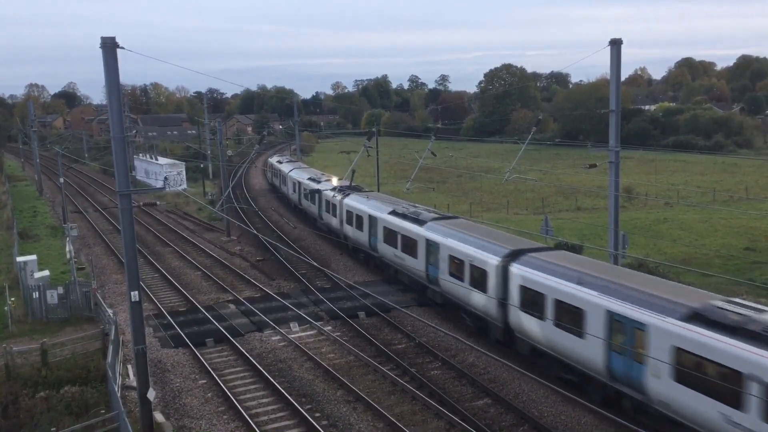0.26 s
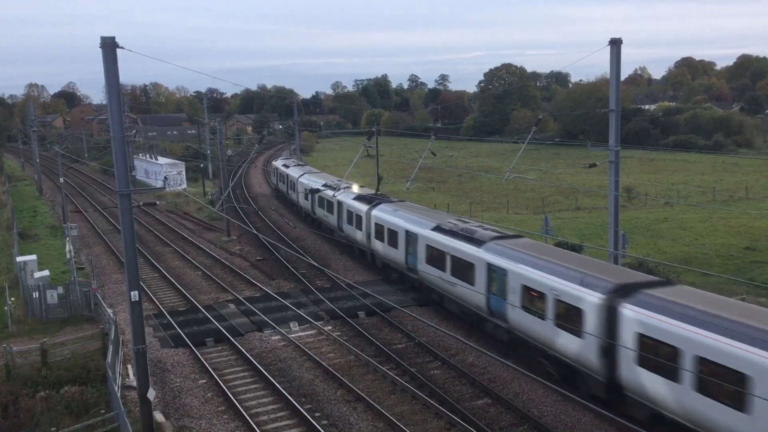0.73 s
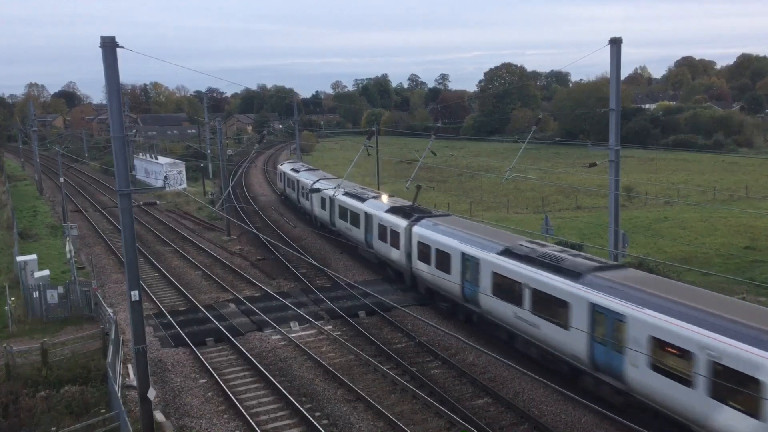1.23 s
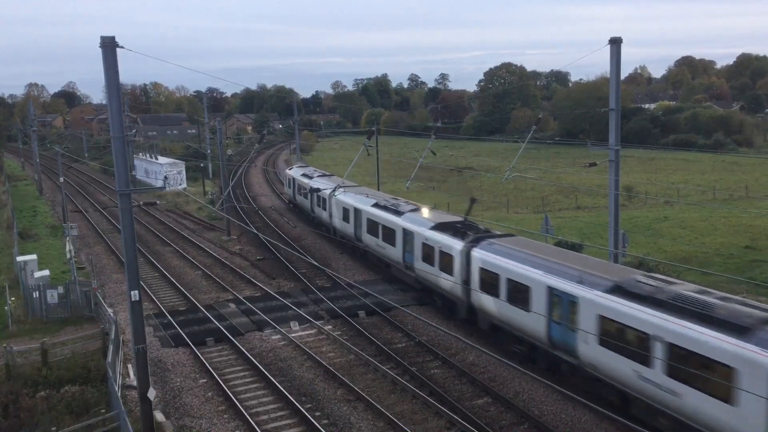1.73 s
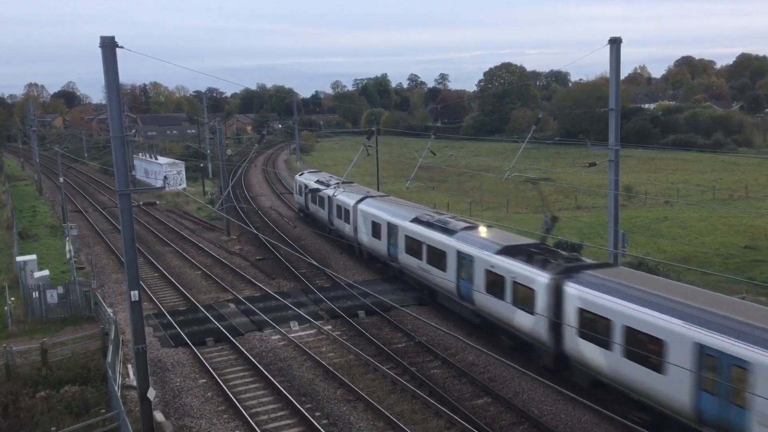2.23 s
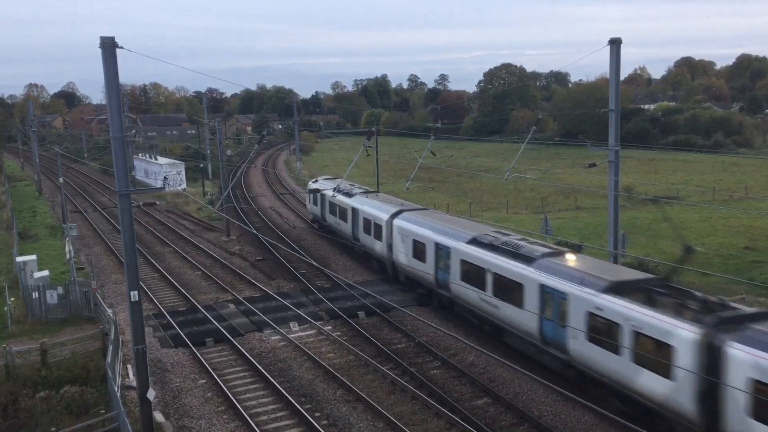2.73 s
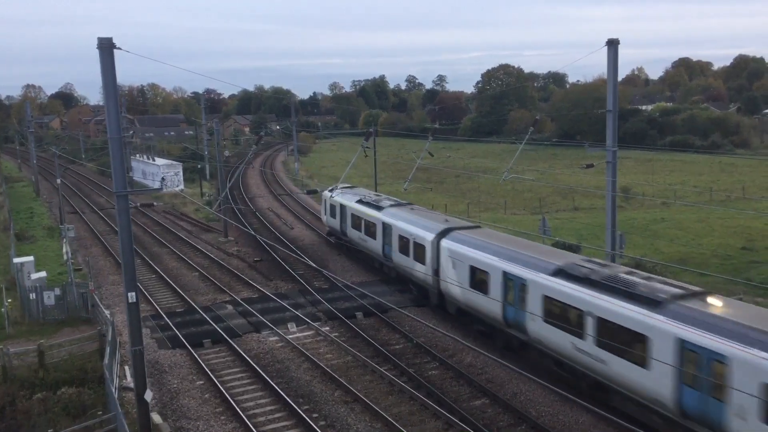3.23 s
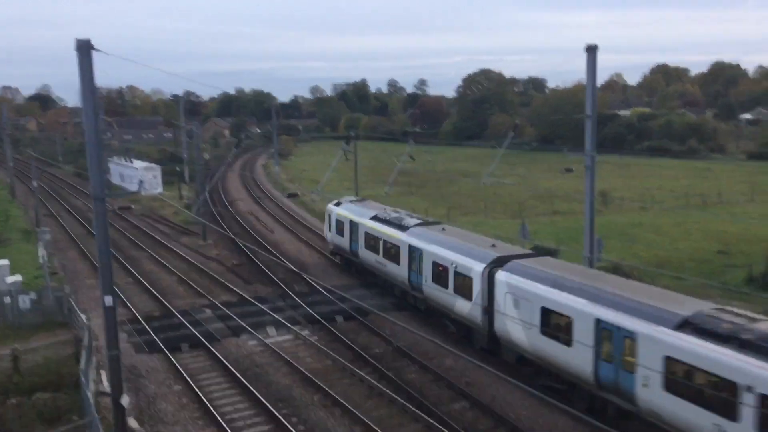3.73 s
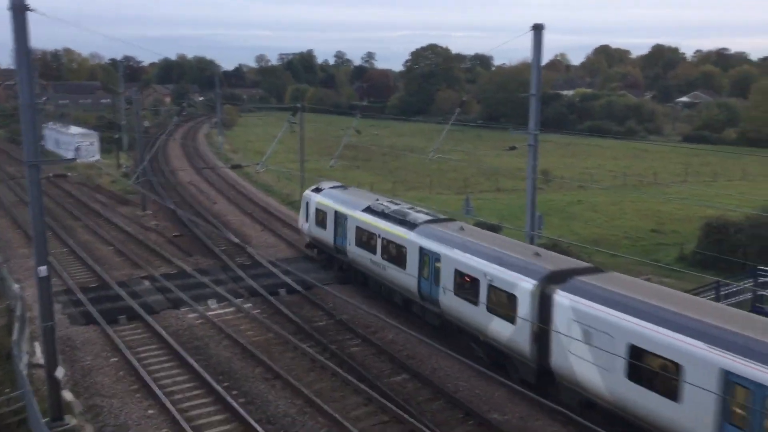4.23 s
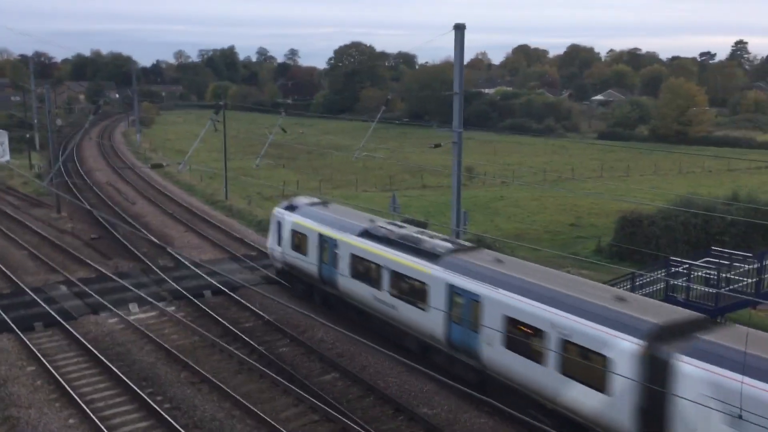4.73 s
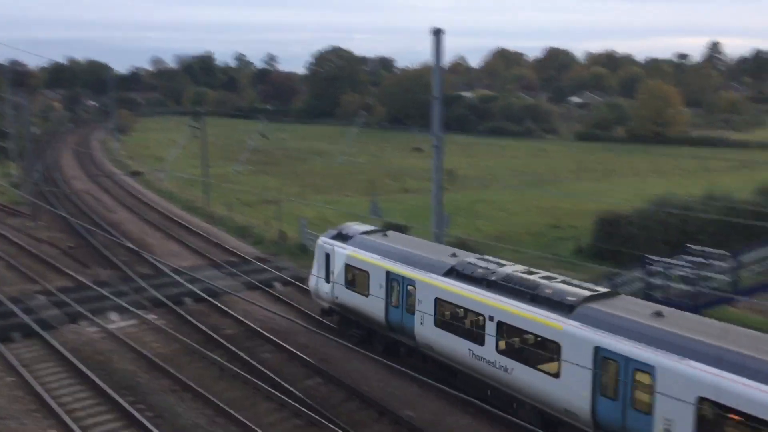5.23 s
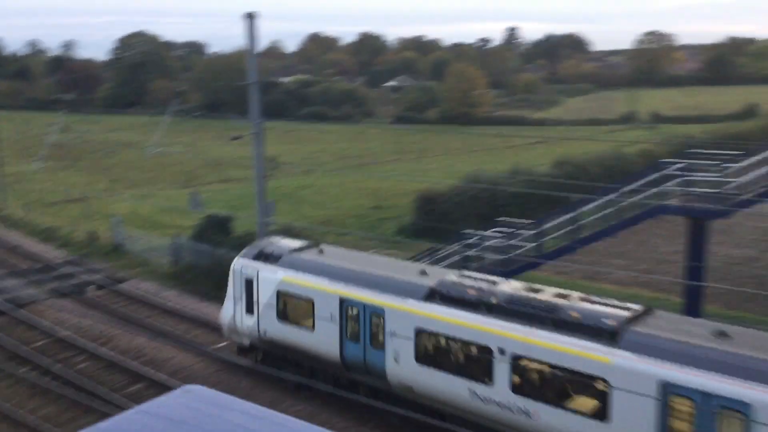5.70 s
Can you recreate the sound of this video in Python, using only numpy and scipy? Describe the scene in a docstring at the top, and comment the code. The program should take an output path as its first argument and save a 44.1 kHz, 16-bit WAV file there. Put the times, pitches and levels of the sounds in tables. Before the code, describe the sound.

Train wheels rumble and sing on the rails, clattering over a junction with dull knocks and ringing double bangs.

```python
"""An electric passenger train runs through a junction below a footbridge.
From the start the wheels roar and sing over a low rumble, and the pointwork answers with dull knocks
and short cracks. From half a second on, each bogie bangs twice over a ringing crossing, its flanges
sizzling on the check rail. Near 1.7 s one flange scrapes and squeaks. Around 3.5 s a rasping drone
climbs briefly under one coach, and more bogies bang through to the end."""
import sys
import numpy as np
from scipy import signal
from scipy.fft import rfft, irfft, next_fast_len
from scipy.io import wavfile
from scipy.ndimage import map_coordinates

SR = 44100
rng = np.random.default_rng(int(sys.argv[2]) if len(sys.argv) > 2 else 0)


def store_pcm(level_fs):
    """Save levels as 16-bit WAV."""
    pcm = np.round(np.clip(level_fs, -1, 1) * 32767).astype(np.int16)
    wavfile.write(sys.argv[1], SR, np.atleast_2d(pcm).T)


N = 262835
T = np.arange(N) / SR

# ringing modes of the wheel discs: pitch_hz, width_hz, level_db
WHEEL_MODES = [(1425, 24, -12), (2105, 46, -11), (2163, 37, -11.5), (2280, 92, -18), (2797, 66, -15),
               (2878, 83, -11.5), (3235, 260, -18.5), (3604, 68, -17), (4020, 79, -24.5),
               (4600, 133, -19.5), (5610, 110, -22.5), (6600, 280, -28), (7620, 140, -32)]
# tone of the rumbling track and car bodies: frequency_hz, level_db
RUMBLE_SPECTRUM = [(20, -21), (35, -12), (60, 5), (130, 3), (260, 1.5), (380, -9.5), (700, -14),
                   (1500, -70)]
# rise and fall of that rumble: time_s, level_db
RUMBLE_LEVELS = [(0.0, -37.5), (1.39, -41), (1.53, -51), (1.91, -40), (2.21, -41), (2.9, -41.5), (3.2, -41),
                 (3.78, -41.5), (4.87, -44.5), (5.25, -39), (5.68, -52.5), (5.96, -40)]
# boom of the sleepers under a wheel: frequency_hz, level_db
BOOM_SPECTRUM = [(20, -47), (45, -20.5), (70, -5), (115, -3.5), (175, 0), (230, -8.5), (320, -15),
                 (600, -63.5), (3000, -110)]
# wheels striking the crossing, two to a bogie:
# start_s, thump_db, clang_db, wheel_ring_db, bite_db, wave_pitch_factor, sizzle_db
WHEEL_STRIKES = [(.541, -24, -22.5, -17, -29, 1.12, -46), (.732, -30, -24, -23, -35, 1.02, -65),
                 (1.046, -21.5, -19.5, -16.5, -37, 1.03, -45.5), (1.237, -26, -23.5, -22.5, -35, 0.94, -66),
                 (2.247, -26, -22, -20.5, -26.5, 1.07, -75), (2.438, -26, -25.5, -23.5, -39, 1.04, -74),
                 (2.757, -43, -27, -23.5, -35, 1.03, -78), (2.941, -33.5, -27.5, -22, -52, 0.99, -72),
                 (3.972, -25, -20, -23, -36, 1.06, -46), (4.157, -30, -27, -23, -45, 0.96, -66),
                 (4.484, -35, -22, -24, -35.5, 1.1, -46.5), (4.676, -27, -22.5, -25, -37, 0.99, -68),
                 (5.706, -24, -19.5, -25, -29.5, 0.92, -49.5), (5.899, -23, -24, -24, -32, 0.9, -75)]
# high wheel modes that a rubbing flange wakes: pitch_hz, width_hz, level_db
FLANGE_MODES = [(3160, 45, 18), (4040, 55, 13), (4240, 36, 16), (4660, 60, 4), (5100, 66, 7), (5280, 64, 6),
                (6200, 37, 4), (6370, 37, 9.5), (7200, 56, 7), (7430, 50, -2), (8170, 220, 4),
                (9420, 190, 3), (10500, 76, -1), (11550, 130, -2), (12400, 160, -8), (13500, 120, 2),
                (14300, 100, 3)]
# a flange scraping along the rail: frequency_hz, level_db
SCRAPE_SPECTRUM = [(900, -24), (1600, -6), (2200, 0), (3100, -15), (4100, -14), (5200, -3), (6400, -6),
                   (7500, -10), (9400, -10), (10200, -10), (11500, -12), (14000, -13), (15700, -24)]


def gain_of(db):
    """Decibels to amplitude."""
    return 10 ** (np.asarray(db) / 20)


def unit_rms(x):
    """Scales to an rms of one."""
    return x / np.sqrt(np.mean(x ** 2) + 1e-20)


def unit_hit(x, span_s=.04):
    """Gives a hit the energy of span_s seconds at an rms of one."""
    return x * np.sqrt(span_s * SR / np.sum(x ** 2))


def follow(curve, times=T):
    """Reads a curve of (time_s, value) at the given times."""
    return np.interp(times, *np.transpose(curve))


def tint(x, spectrum, pitch=1):
    """A causal EQ drawn as (frequency_hz, level_db), shifted by the factor pitch."""
    hz, db = np.transpose(spectrum)
    size = 2 * next_fast_len(len(x) // 2 + 1)
    bin_hz = abs(np.fft.fftfreq(size, 1 / SR))
    log_gain = np.log(gain_of(np.interp(np.log(bin_hz + 1), np.log(hz * pitch), db)))
    response = np.exp(np.conj(signal.hilbert(log_gain)))  # minimum phase
    return irfft(rfft(x, size) * response[:size // 2 + 1], size)[:len(x)]


def noise(spectrum):
    """Steady coloured noise with an rms of one."""
    return unit_rms(tint(rng.standard_normal(N), spectrum))


def wander(hz):
    """A random drift with an rms of one, moving at up to about hz."""
    knots = np.arange(0, T[-1] + 1, .5 / hz)
    return unit_rms(np.interp(T, knots, rng.standard_normal(N)[:len(knots)]))


def waver(x, depth, hz):
    """Lets the pitch drift by the fraction depth, up to about hz times a second."""
    drift = wander(hz)
    return map_coordinates(x, [np.cumsum(1 + depth * (drift - drift.mean()))], order=3, mode="mirror")


def resonate(force, modes):
    """Drives parallel resonances (pitch_hz, width_hz, level_db) with a force."""
    out = np.zeros(N)
    for hz, width, db in modes:
        b, a = signal.iirpeak(hz, hz / width, SR)
        out += gain_of(db) * signal.lfilter(b, a, force)
    return out


def add(mix, start_s, sound):
    """Mixes a sound in at start_s."""
    start = round(start_s * SR)
    sound = sound[max(-start, 0):]
    part = mix[max(start, 0):][:len(sound)]
    part += sound[:len(part)]


def hit_envelope(t, rise_s, decay_s):
    """Swells to a peak at t = 0, then dies away."""
    return np.exp(np.where(t < 0, -(t / rise_s) ** 2, -abs(t) / decay_s))


def bursts(hits, spectrum, rise_s, span_s=.04):
    """A rattling noise burst for each hit (peak_s, level_db, decay_s, pitch_factor)."""
    out = np.zeros(N)
    for peak_s, db, decay_s, pitch in hits:
        t = np.arange(-3 * rise_s, 6 * decay_s + .04, 1 / SR)
        burst = tint(rng.standard_normal(len(t)) * hit_envelope(t, rise_s, decay_s), spectrum, pitch)
        add(out, peak_s + t[0], gain_of(db) * unit_hit(burst, span_s))
    return out


def bending_wave(spectrum, pitch, travel_s, echo_gain, echo_s):
    """A pulse runs along the rail, highs first, roughened by echoes from the sleepers."""
    size = 4096
    hz, t = np.fft.rfftfreq(size, 1 / SR), np.arange(size) / SR
    pulse = irfft(np.exp(-4j * np.pi * travel_s * np.sqrt(500 * hz)))  # 500 Hz arrives after travel_s
    echoes = rng.standard_normal(size) * np.exp(-t / echo_s)
    pulse += echo_gain * signal.fftconvolve(pulse, echoes / np.linalg.norm(echoes))[:size]
    return tint(pulse, spectrum, pitch)


def rolling(roar_db=-40, ring_db=-.7, rumble_db=6.5, flutter_db=1.5, ring_flutter_db=2.6, lump_db=4):
    """Rough steel on rough steel: a broad roar, singing wheels and a lumpy rumble."""
    # roar of wheel on rail, and the contact force on the wheel: frequency_hz, level_db
    roar_spectrum = [(150, -8), (350, -0.5), (560, 4.5), (800, 1), (1050, -4), (1400, -4.5), (1800, -8),
                     (2500, -7.5), (3300, -19.5), (4200, -20), (5600, -19.5), (8000, -32), (9400, -31),
                     (10100, -42), (11400, -35), (13500, -46), (15500, -58)]
    force_spectrum = [(600, -17.5), (1500, 7.5), (6000, -3.0), (11000, -8.5)]
    # singing of the passing wheels: time_s, level_db
    singing_levels = [(0.0, -44), (0.43, -45), (2.01, -43), (2.34, -46), (3.24, -43.5), (3.98, -48),
                      (4.85, -46.5), (5.24, -46), (5.96, -45.5)]
    roar = noise(roar_spectrum) * gain_of(roar_db + flutter_db * wander(14))
    force = noise(force_spectrum)
    # each mode swells and fades by itself as the contact patch roams over the tread
    ring = sum(resonate(force, [mode]) * gain_of(ring_flutter_db * wander(14)) for mode in WHEEL_MODES)
    ring = unit_rms(waver(ring, depth=.009, hz=7)) * gain_of(follow(singing_levels) + ring_db)
    rumble = noise(RUMBLE_SPECTRUM) * gain_of(follow(RUMBLE_LEVELS) + rumble_db + lump_db * wander(16))
    return roar + ring + rumble


def pointwork(light_per_s=7, light_decay_s=.0053, nominal_hz=335, shake_db=-7.5, shake_decay_s=.04):
    """Each wheel drops a little: the sleepers boom and the rail knocks, both damped by ballast."""
    # heavy wheel drops: peak_s, boom_db, knock_db, pitch_hz (nominal_hz leaves the knock unshifted), decay_s
    heavy_drops = [(0.013, -27, -26.5, 352, 0.0095), (0.178, -30.5, -29, 280, 0.0054),
                   (0.32, -29, -28.5, 342, 0.0034), (.337, -25, -28.5, 380, 0.0066),
                   (0.521, -22, -35, 370, 0.0017), (.678, -28.5, -33, 333, .006),
                   (0.716, -19, -26, 320, 0.012), (.972, -28, -32, 350, 0.0014),
                   (1.111, -25.5, -26, 305, 0.0098), (1.321, -25.5, -26.5, 318, 0.022),
                   (1.348, -21.5, -25, 320, 0.0082), (1.456, -22, -28.5, 352, 0.0067),
                   (1.546, -24.5, -28.5, 393, 0.0081), (1.56, -30, -32, 646, 0.015),
                   (1.583, -20.5, -30, 373, 0.0048), (1.605, -32, -24.5, 480, 0.0092),
                   (1.617, -18, -24.5, 430, 0.0059), (1.655, -21, -55, 355, 0.003),
                   (1.737, -26, -26, 243, 0.0042), (1.955, -42, -32, 350, 0.0048),
                   (2.07, -31, -31.5, 358, 0.0033), (2.081, -32, -31, 342, 0.0038),
                   (2.173, -14, -27.5, 400, 0.0055), (2.208, -29, -30, 400, 0.0023),
                   (2.225, -27, -28.5, 315, 0.015), (2.345, -20.5, -22, 344, 0.0036),
                   (2.524, -32, -30, 323, .005), (2.666, -30, -30.5, 300, 0.0078),
                   (2.683, -23.5, -36, 340, 0.002), (2.763, -21.5, -21, 278, 0.0054),
                   (2.851, -23.5, -34, 300, 0.0085), (3.025, -34, -26.5, 295, 0.0036),
                   (3.15, -30, -34, 284, 0.012), (3.23, -32, -36, 320, 0.01),
                   (3.485, -33, -33.5, 308, 0.005), (3.542, -32, -44, 270, 0.0049),
                   (3.602, -29, -43, 400, 0.0056), (3.712, -29, -30, 404, 0.014),
                   (3.795, -22.5, -32, 344, 0.0024), (3.865, -32, -35, 332, 0.0063),
                   (3.926, -35, -28, 365, 0.006), (3.963, -23, -24, 340, 0.0075),
                   (4.003, -29, -25, 373, 0.0039), (4.056, -32, -25, 332, 0.012),
                   (4.079, -19.5, -37, 368, 0.0039), (4.191, -22, -23.5, 332, 0.018),
                   (4.226, -23.5, -21, 304, 0.0035), (4.461, -20, -19, 318, 0.023),
                   (4.577, -19.5, -27, 360, 0.023), (4.758, -21, -31, 326, 0.0031),
                   (4.791, -32.5, -40, 540, 0.0042), (4.894, -28, -45, 348, .005),
                   (4.919, -28, -39, 416, 0.0038), (4.935, -23.5, -42, 350, .004),
                   (5.014, -32, -32, 397, 0.029), (5.067, -25.5, -23, 350, 0.0021),
                   (5.091, -30.5, -33, 605, 0.014), (5.114, -29.5, -27, 403, 0.0016),
                   (5.153, -36, -38, 450, .004), (5.182, -20, -28.5, 400, 0.0062),
                   (5.191, -17.5, -31, 440, 0.013), (5.214, -21, -33, 392, 0.0023),
                   (5.258, -29, -32, 330, 0.0064), (5.277, -25, -28.5, 300, 0.0083),
                   (5.301, -27, -31.5, 397, 0.0072), (5.321, -26, -37, 330, 0.0035),
                   (5.345, -25, -20.5, 280, 0.01), (5.359, -31, -22.5, 279, .008),
                   (5.376, -29.5, -33, 260, 0.0053), (5.418, -32, -25, 314, 0.0055),
                   (5.432, -27, -32, 330, 0.0071), (5.445, -24.5, -28.5, 365, 0.0036),
                   (5.483, -36, -36.5, 383, 0.0067), (5.526, -22, -36.5, 398, 0.0037),
                   (5.567, -24, -23, 338, 0.006), (5.578, -24.5, -28, 273, 0.0046),
                   (5.594, -29, -35, 386, 0.0046), (5.604, -26.5, -35, 298, .005),
                   (5.778, -22, -22, 302, 0.0071), (5.798, -24.5, -28, 347, 0.0085)]
    # dull knock of the rail: frequency_hz, level_db
    knock_spectrum = [(100, -40.5), (200, -10.5), (270, 7.5), (400, -0.5), (550, -8.5), (780, -17.5),
                      (1000, -35), (1600, -30), (4000, -57), (12000, -105)]
    drops = list(heavy_drops)
    for slot_s in np.arange(0, T[-1], 1 / light_per_s):  # light drops ride the rumble's level
        db = follow(RUMBLE_LEVELS, slot_s) - rng.standard_normal()
        drops.append((slot_s + rng.random() / light_per_s, db + 7, db - 2, nominal_hz, light_decay_s))
    # a heavier drop booms lower
    booms = [(s - .004, db, decay, 2 ** (-.0154 * (db + 27))) for s, db, _, _, decay in drops]
    knocks = [(s - .003, db, decay, hz / nominal_hz) for s, _, db, hz, decay in drops]
    # the track bed shakes on after each heavy drop
    shakes = [(s, db + shake_db, shake_decay_s, 1) for s, db, *_ in heavy_drops]
    return (bursts(booms, BOOM_SPECTRUM, rise_s=.002484, span_s=.02)
            + bursts(knocks, knock_spectrum, rise_s=.002499, span_s=.02)
            + bursts(shakes, RUMBLE_SPECTRUM, rise_s=.01, span_s=.02))


def rail_cracks(travel_s=.00343):
    """Some wheels hit bare steel and send a short crack down the rail."""
    # steel-on-steel hits in the pointwork: arrival_s, level_db, pitch_factor
    hits = [(.335, -29, 0.82), (1.347, -31.5, 0.73), (1.558, -36, 1.15), (1.603, -24.5, 0.62),
            (1.615, -25.5, 0.9), (2.167, -29.5, 0.91), (2.205, -29, .95), (2.769, -30, 0.87),
            (4.074, -47, .9), (4.224, -29, 0.74), (4.577, -29, 0.85), (4.791, -35, 1.05),
            (5.065, -26.5, 0.94), (5.112, -26.5, 0.92), (5.189, -27, 1.2), (5.209, -34.5, 1.47)]
    # tone of a crack: frequency_hz, level_db
    crack_spectrum = [(150, -21), (350, -3.5), (550, -2), (760, -1), (1000, -17), (1500, -23.5),
                      (2200, -31.5), (5000, -47), (12000, -84)]
    out = np.zeros(N)
    for arrival_s, db, pitch in hits:
        crack = bending_wave(crack_spectrum, pitch, travel_s, echo_gain=.7, echo_s=.0071)
        add(out, arrival_s - travel_s, gain_of(db) * unit_hit(crack, span_s=.02))
    return out


def crossing_bangs():
    """A wheel hits the crossing nose: a rail wave, tick, bite, thump and clang, and the wheel rings on."""
    # wave in the rail, contact tick, hard bite of steel, clang, jolt to the wheel: frequency_hz, level_db
    wave_spectrum = [(150, -33), (300, -8), (450, 4.5), (550, 2), (660, -6.5), (900, -11.5), (1080, -26),
                     (1380, -13.5), (1700, -41), (2400, -57), (6000, -101)]
    tick_spectrum = [(1500, -35), (3200, 13), (4700, 5), (7000, -2), (9000, -6), (12000, -35), (15500, -26)]
    bite_spectrum = [(450, -29.5), (730, 3.5), (820, 1.5), (920, 3.5), (1080, -10.5), (1350, -3),
                     (1600, -16.5), (2400, -17), (4000, -31.5), (9000, -59)]
    clang_spectrum = [(200, -8.5), (340, 0), (450, 4.5), (550, 1), (640, -3.5), (760, -5), (930, -13),
                      (1060, -14.5), (1350, -18), (1600, -22.5), (3000, -29), (6000, -40), (12000, -74)]
    jolt_spectrum = [(1200, 10.0), (1900, 10.5), (2400, 14.0), (3000, -2), (6000, 0.5), (10000, -6.0)]
    out, jolts = np.zeros(N), np.zeros(N)
    for s, thump_db, clang_db, ring_db, bite_db, pitch, sizzle_db in WHEEL_STRIKES:
        wave = bending_wave(wave_spectrum, pitch, travel_s=.015, echo_gain=.99, echo_s=.0087)
        add(out, s - .009, gain_of(clang_db - 6.5) * unit_hit(wave))
        tick_db = -54 + .3 * max(-68 - sizzle_db, 0)  # a little louder where the flange barely grazes
        out += bursts([(s + .008, tick_db, .04, 1)], tick_spectrum, rise_s=.006)
        out += bursts([(s + .005, bite_db - 1, .023, 1)], bite_spectrum, rise_s=.004)
        out += bursts([(s + .0119, thump_db - 1, .016, 1)], BOOM_SPECTRUM, rise_s=.00739)
        out += bursts([(s + .007, clang_db - 6, .017, 1)], clang_spectrum, rise_s=.006)
        out += bursts([(s + .025, clang_db - 10, .056, 1)], clang_spectrum, rise_s=.015)  # rattling tail
        jolts += bursts([(s + .01, ring_db + 1.5, .046, 1)], jolt_spectrum, rise_s=.008)
    return out + resonate(jolts, WHEEL_MODES)


def crossing_ring(ring_db=-4, climb_s=.0079, detune=.014):
    """The crossing rings; its modes build up while the wheel's weight climbs onto the nose."""
    # modes of the crossing and its rails: pitch_hz, level_db, t60_s
    crossing_modes = [(448.3, -6.5, 0.44), (501, 4, 0.083), (544.3, -0.5, 0.16), (735.5, -3.5, 0.11),
                      (897.4, -9.5, 0.14), (946, -16, 0.098), (1206, -24.5, 0.33), (1396, -25, 0.051)]
    hz, level_db, t60_s = np.transpose(crossing_modes)[:, :, None]
    out, t = np.zeros(N), np.arange(SR // 2) / SR
    attack = 1 - np.exp(-(t / climb_s) ** 2)
    envelopes = attack * gain_of(level_db - 60 * t / t60_s)
    for start_s, _, clang_db, *_ in WHEEL_STRIKES:
        detuned_hz = hz * (1 + detune * rng.standard_normal(hz.shape))
        modes = envelopes * np.sin(2 * np.pi * (detuned_hz * t + rng.random(hz.shape)))
        add(out, start_s, gain_of(clang_db + ring_db) * unit_hit(modes.sum(0)))
    return out


def flange_rubs(sizzle_hiss_db=-4.5, scrape_hiss_db=-7, wheel_db=12):
    """Flanges clip the check rail and one scrapes along it: hiss and ringing wheel modes."""
    # sizzle of a flange on the check rail: frequency_hz, level_db
    sizzle_spectrum = [(1500, -40), (3500, -20), (6500, 4), (8000, 1), (8800, 4), (10000, 4.5),
                       (11400, 10.5), (12800, 9), (14000, 0), (15700, -2), (22000, -32), (30000, -50)]
    clips = [(s - .001, db + 2, .042, 1) for s, *_, db in WHEEL_STRIKES]
    sizzle = bursts(clips, sizzle_spectrum, rise_s=.0017)
    scrape = bursts([(1.635, -53, .03, 1.36)], SCRAPE_SPECTRUM, rise_s=.025)  # a thin first touch
    scrape += bursts([(1.667, -43, .06, .94)], SCRAPE_SPECTRUM, rise_s=.014)
    high_ring = waver(resonate(sizzle + scrape, FLANGE_MODES), depth=.0019, hz=70)
    disc_ring = gain_of(wheel_db) * resonate(scrape, WHEEL_MODES)
    return gain_of(sizzle_hiss_db) * sizzle + gain_of(scrape_hiss_db) * scrape + high_ring + disc_ring


def flange_squeak(squeak_db=-53.5, peak_s=1.668, flutter_db=4, slip=.0035, tilt_db_per_octave=-4):
    """At the height of the scrape the flange sticks and slips, and the wheel sings in rough tones."""
    tones = np.zeros(N)
    for hz, _, db in FLANGE_MODES:
        scrape_db = np.interp(hz, *np.transpose(SCRAPE_SPECTRUM))
        tilt_db = tilt_db_per_octave * np.log2(hz / FLANGE_MODES[0][0])
        level = gain_of(db + scrape_db + tilt_db + flutter_db * wander(110))
        phase = 2 * np.pi * np.cumsum(hz * (1 + slip * wander(140))) / SR
        tones += level * np.sqrt(2) * np.sin(phase)
    return gain_of(squeak_db) * tones * hit_envelope(T - peak_s, rise_s=.012, decay_s=.042)


def gear_drone(wobble_hz=9, flutter_db=2.5, rasp_db=-11):
    """A thin, rasping note from the running gear climbs, swelling and breaking off."""
    # the note's climb: time_s, pitch_hz
    climb = [(3.45, 170), (3.56, 182.7), (3.66, 201), (3.7, 223), (3.725, 261.4), (3.97, 263.2)]
    # its short swells: peak_s, level_db, half_length_s
    swells = [(3.499, -29, .022), (3.543, -25, 0.016), (3.661, -26, 0.021), (3.729, -25.5, 0.029),
              (3.879, -23.5, 0.02), (3.943, -22.5, 0.019)]
    # the rasp that pulses with each cycle: frequency_hz, level_db
    rasp_spectrum = [(100, -22), (220, 1), (350, 0.5), (480, -7.5), (700, -4.5), (1000, -21), (2500, -50),
                     (8000, -100)]
    phase = 2 * np.pi * np.cumsum(follow(climb) + wobble_hz * wander(40)) / SR
    envelope = sum(gain_of(db) * np.exp(-((T - s) / half_s) ** 2) for s, db, half_s in swells)
    note = unit_rms(gain_of(flutter_db * wander(60)) * np.sin(phase))
    rasp = unit_rms(tint(rng.standard_normal(N) * (1 + np.cos(phase)), rasp_spectrum))
    return envelope * (note + gain_of(rasp_db) * rasp)


def scene():
    """The train as heard from the bridge, in open air and in mono."""
    track = rolling() + pointwork() + rail_cracks() + crossing_bangs() + crossing_ring()
    return (track + flange_rubs() + flange_squeak() + gear_drone())[None]


def record(dry, low_cut_hz=30, high_cut_hz=15700):
    """The microphone loses the deepest bass, and a steep filter trims the highest treble."""
    thinned = signal.sosfilt(signal.butter(2, low_cut_hz, "highpass", fs=SR, output="sos"), dry)
    high_cut = signal.firwin(511, high_cut_hz, window=("kaiser", 9), fs=SR)
    return signal.oaconvolve(thinned, high_cut[None], "same")


dry = scene()
out = record(dry)
store_pcm(out)
```